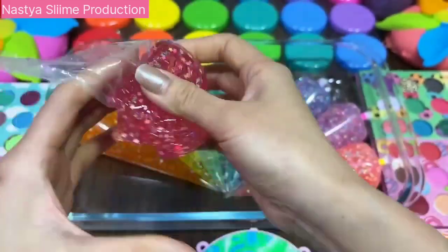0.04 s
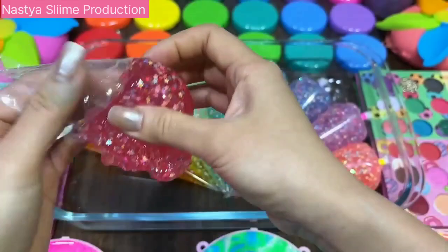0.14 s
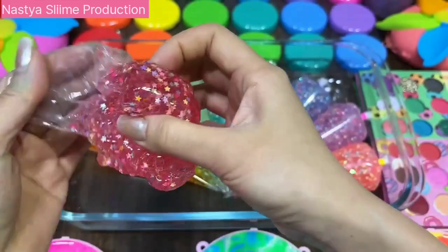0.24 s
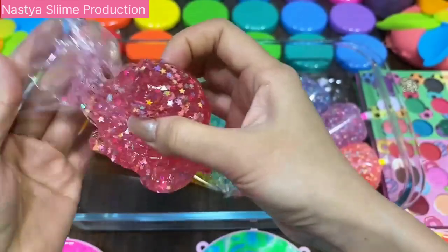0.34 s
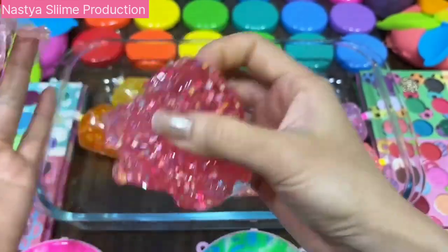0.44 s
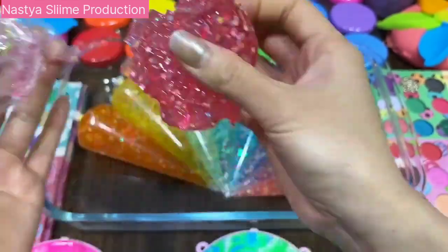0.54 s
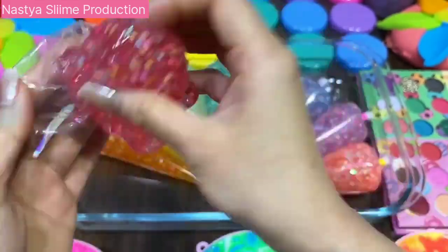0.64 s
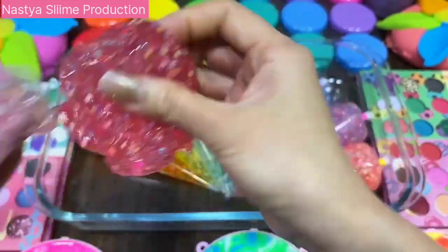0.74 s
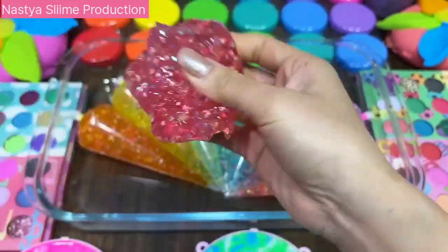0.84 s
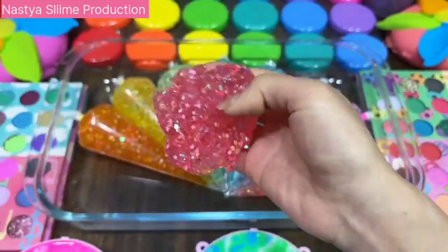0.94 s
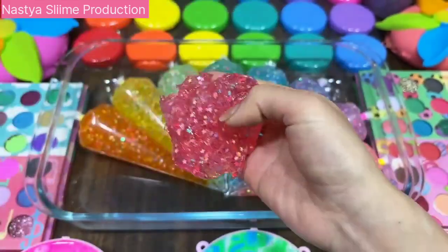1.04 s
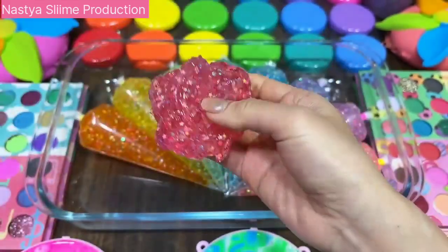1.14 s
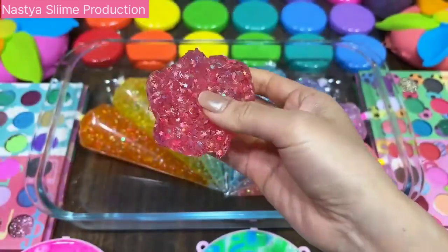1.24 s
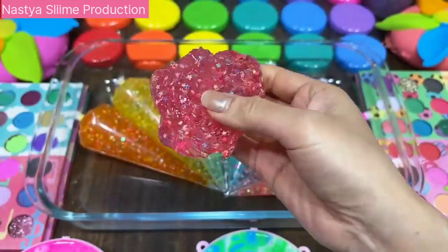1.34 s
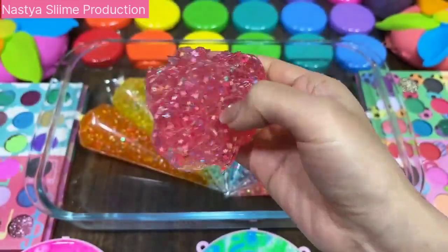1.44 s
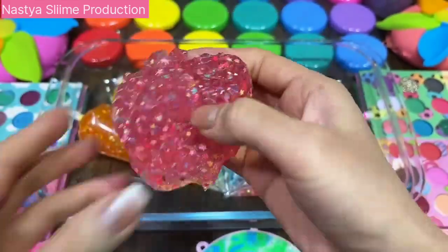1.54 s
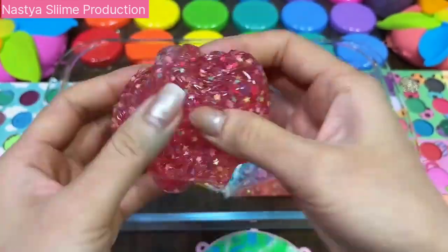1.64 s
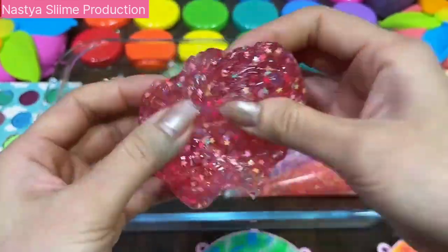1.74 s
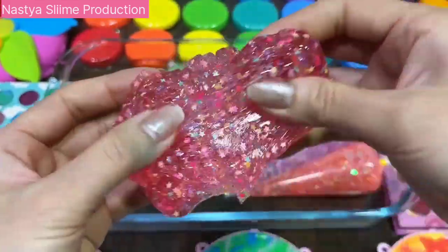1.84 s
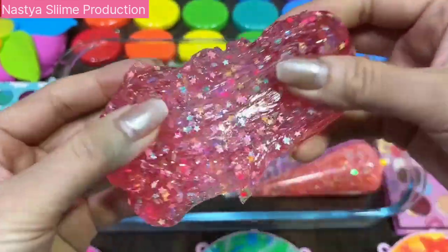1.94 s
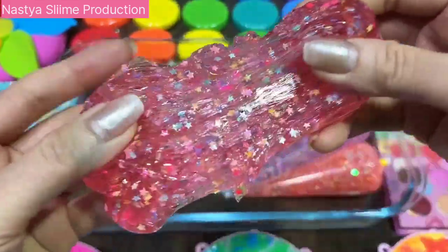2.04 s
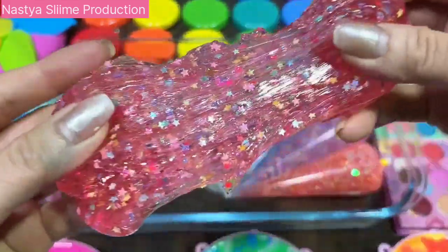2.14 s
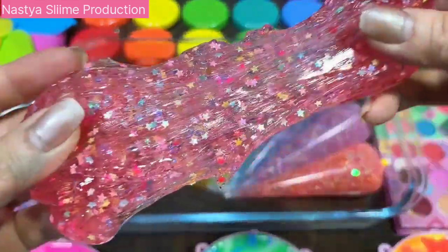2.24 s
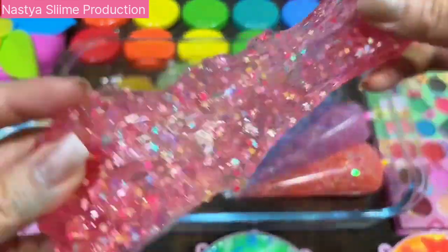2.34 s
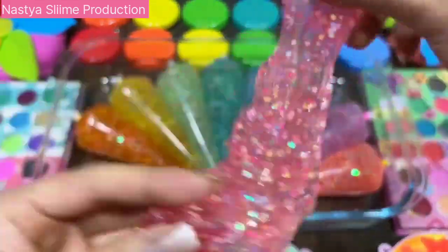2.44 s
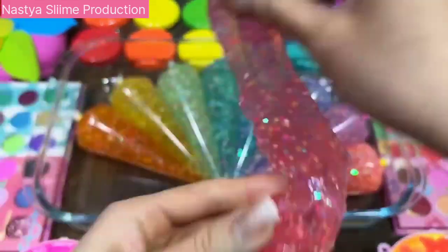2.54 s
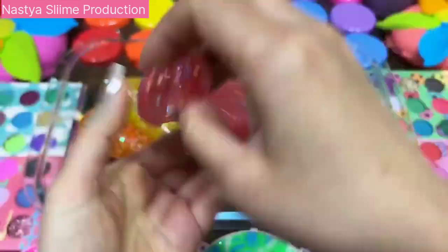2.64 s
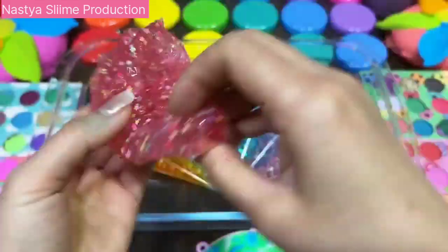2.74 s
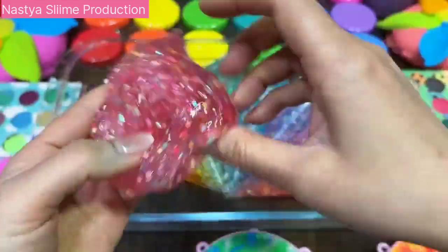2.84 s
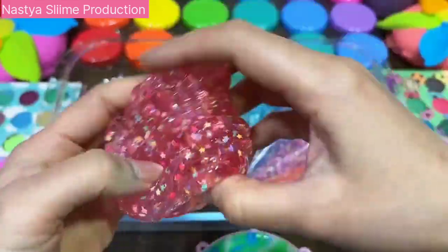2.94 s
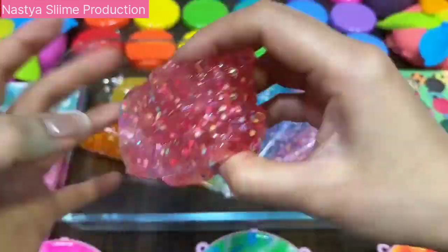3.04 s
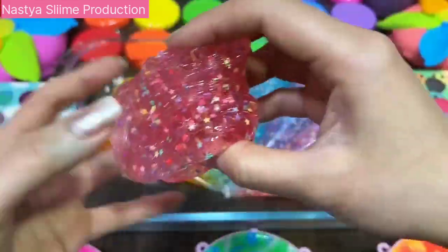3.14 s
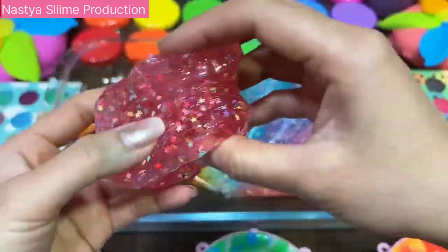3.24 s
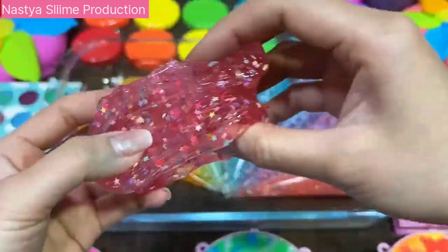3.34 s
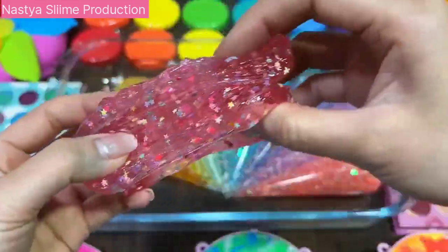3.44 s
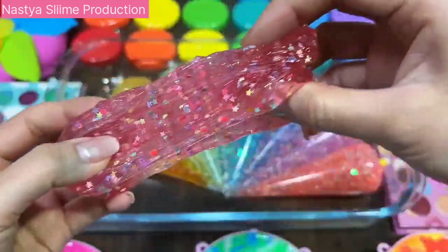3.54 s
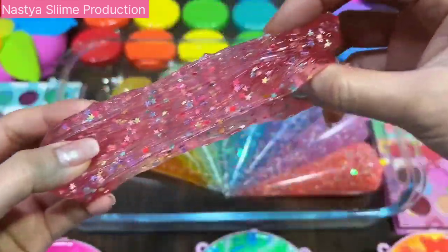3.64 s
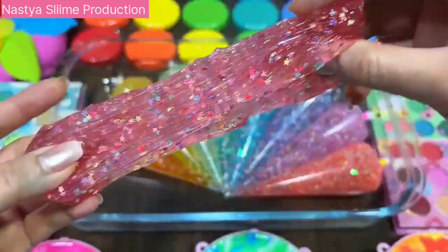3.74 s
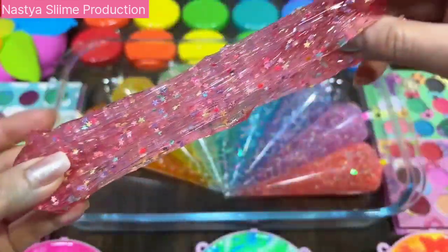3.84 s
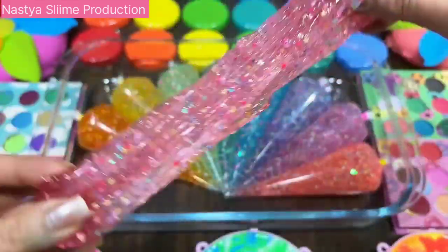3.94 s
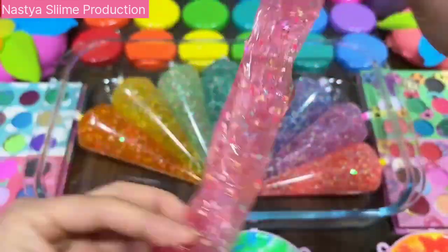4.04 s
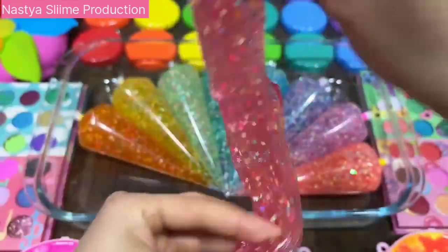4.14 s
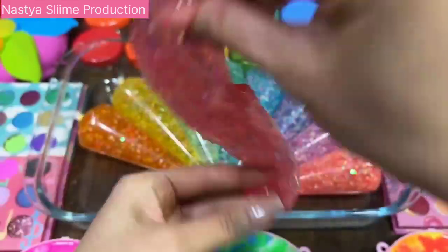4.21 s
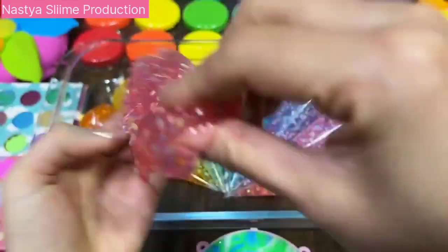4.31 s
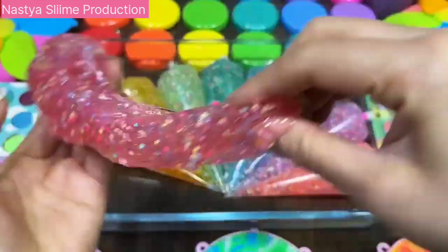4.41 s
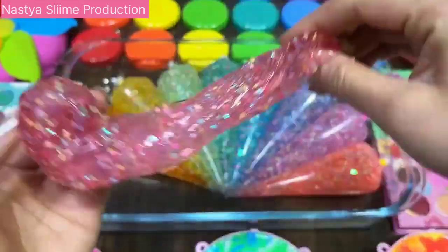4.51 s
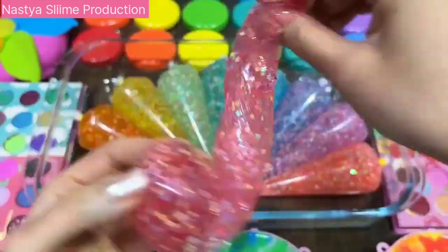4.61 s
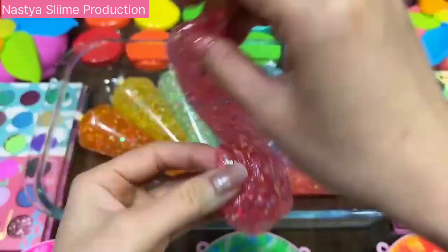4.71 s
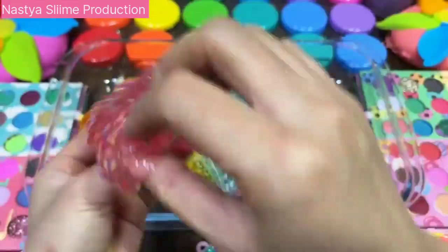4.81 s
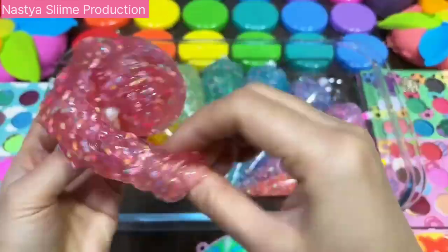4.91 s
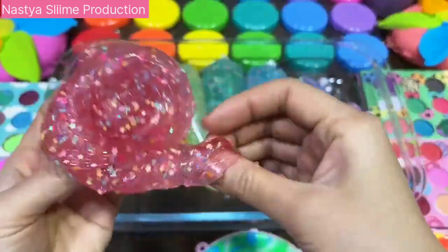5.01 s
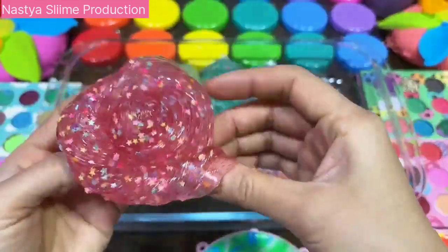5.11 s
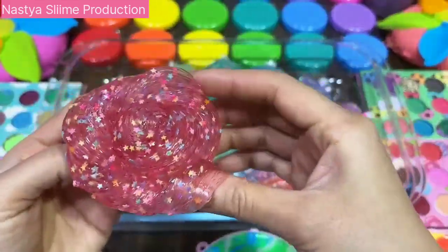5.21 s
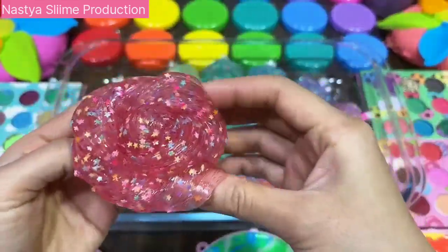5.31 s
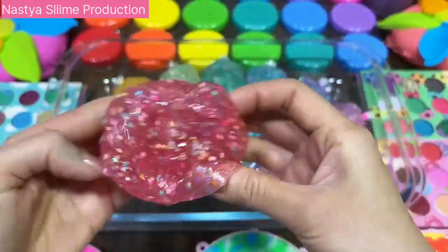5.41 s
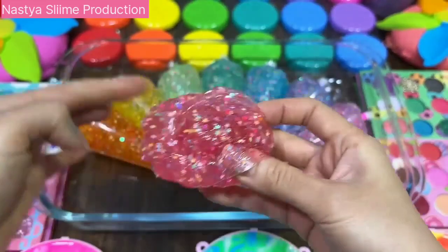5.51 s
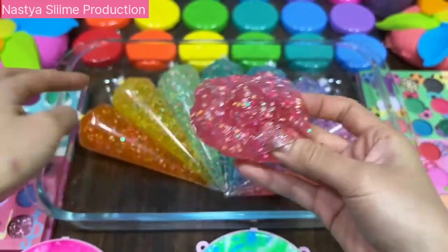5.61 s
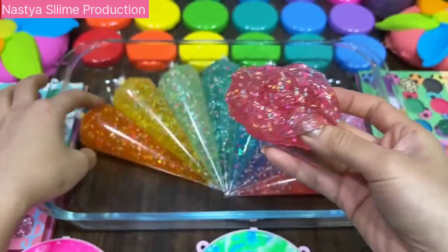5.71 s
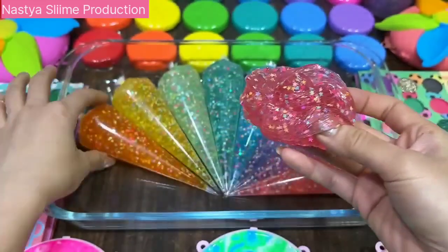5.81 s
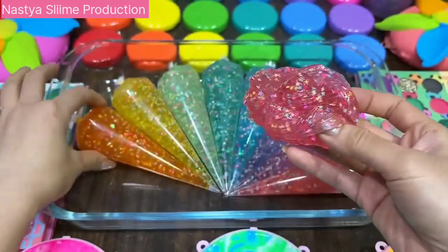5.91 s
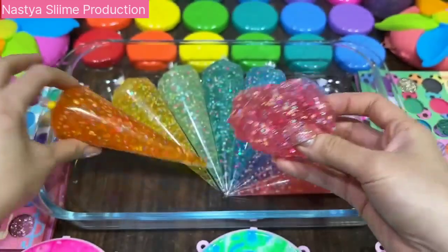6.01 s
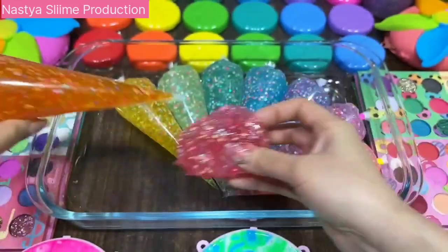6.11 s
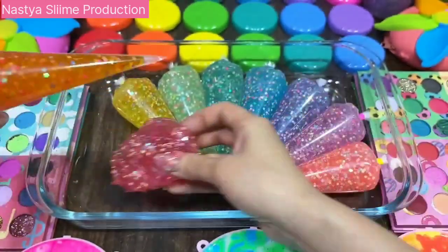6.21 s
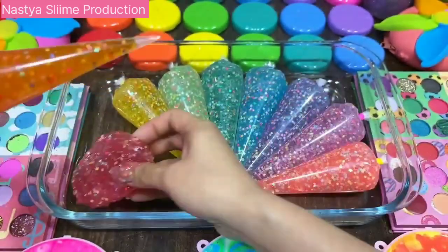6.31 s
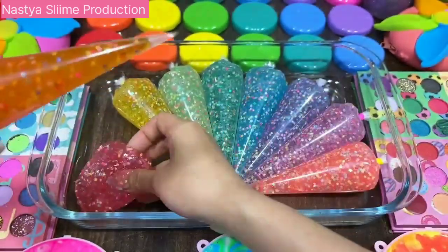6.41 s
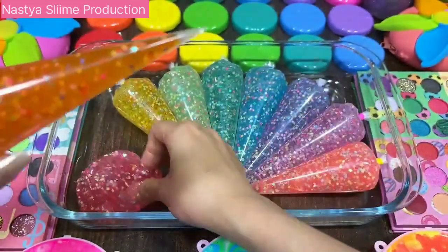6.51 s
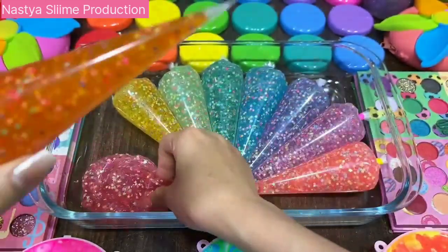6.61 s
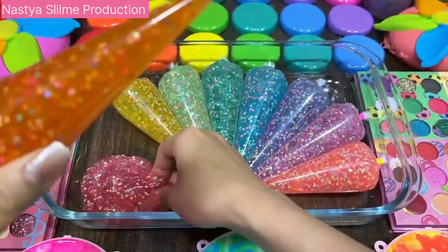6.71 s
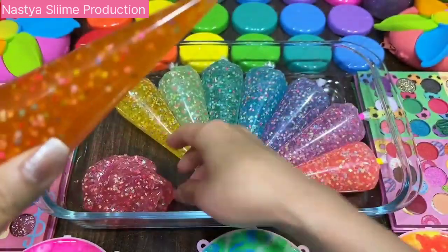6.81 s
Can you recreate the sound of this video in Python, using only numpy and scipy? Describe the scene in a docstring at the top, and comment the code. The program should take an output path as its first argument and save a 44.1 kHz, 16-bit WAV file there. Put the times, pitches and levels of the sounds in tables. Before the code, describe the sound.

Thin film crackles and snaps near the microphone, dense and bright, and stops after one second. After a nearly silent gap with an abrupt cut, glittery slime is squeezed and pulled very softly: small wet ticks, little hollow pops, one crisper click. Late on, it is set down with a muffled low bump and small crackles. Quiet indoor rumble and a narrow high hiss stay underneath.

```python
"""Hands work a thin plastic bag, heard close by in stereo, in a quiet room with low rumble and a hiss near 7 kHz.
First comes a second of loud crumpling: noise and tiny random creases rustle, short bursts with ringing folds snap.
Then an editor's splice plays one short quiet piece three times and leaves a brief silence.
Soft squeezing and sticky ticks follow, with short hollow rings; near 5.8 s damped low rings make a set-down thud.
"""
import sys
import numpy as np
from scipy import signal
from scipy.io import wavfile

SR = 44100
rng = np.random.default_rng(int(sys.argv[2]) if len(sys.argv) > 2 else 0)


def materialize(psi):
    """Save the field psi as 16-bit PCM at rate SR to the path in sys.argv[1].

    A 1-D psi becomes a single channel; in a 2-D psi each row is a channel.
    """
    bounded = np.clip(np.atleast_2d(psi).T, -1, 1)
    quanta = np.round(bounded * 32767).astype(np.int16)
    wavfile.write(sys.argv[1], SR, quanta)


N = 302526   # length in samples, about 6.9 s

# Each squeeze or pull of the film: peak_s, level_db (of the 4.5-8 kHz zone, before the hollows ring along),
# swell_s, fade_s, then relative to that level: low_db, middle_db, treble_db
SQUEEZES = [(.026, -54, .05, 0.082, -10.5, -3, 3), (0.069, -49.5, 0.029, 0.055, -8, -1, -3),
            (0.135, -43.5, 0.02, 0.056, -12, -2, 1), (.17, -49.5, 0.074, 0.087, -3, -1, -4),
            (0.207, -43.5, 0.017, 0.038, -1, 5.5, -14), (.252, -44.5, 0.025, 0.062, 2, 2, -7),
            (.272, -49, 0.036, 0.044, -4.5, 2.5, -7), (0.3, -37, 0.042, 0.073, -6.5, -3, 0.5),
            (.327, -42, .05, 0.03, -9, -3, 10.5), (.357, -42, 0.072, 0.09, -4.5, 2.5, -2.5),
            (.395, -48.5, .06, 0.058, -7.5, -5, 0), (0.426, -47, 0.029, 0.038, 0, -1, 2.5),
            (.527, -57.5, 0.027, 0.035, -10.5, -2, -3), (0.573, -67, 0.035, 0.048, 0, 4, 0),
            (.624, -64.5, 0.027, 0.044, 0, 0.5, -3.5), (.692, -44, .02, 0.056, -8.5, -2, -7),
            (0.717, -29.5, 0.024, 0.025, -21, -8, -3.5), (0.757, -42, 0.051, 0.056, -4.5, -2.5, -5.5),
            (.785, -45.5, 0.049, 0.033, -13, -6, -3.5), (0.81, -54.5, 0.069, 0.027, 1, 6, -7),
            (.866, -73, 0.13, 0.045, -5.5, 3.5, 0), (.94, -56.5, 0.019, 0.082, -9.5, -2, -4.5),
            (0.973, -56, 0.081, 0.027, -8.5, 2, 2.5), (1.0, -72.5, .05, 0.058, -13.5, 3.5, -7.5),
            (1.07, -81.5, .1, .2, -24, -9, -12), (1.225, -77.5, 0.088, .08, -20, -12.5, -6.5),
            (2.032, -75, 0.032, .08, -27.5, -18, -18.5), (2.116, -81.5, 0.038, 0.16, -25, -9.5, -11.5),
            (2.182, -70.5, 0.051, 0.038, -31.5, -6.5, -1), (2.243, -78.5, 0.042, 0.12, -25, 1.5, -2),
            (2.382, -76, .13, 0.22, -21.5, -8, 0), (2.495, -71, .045, 0.26, -24, -13.5, -6),
            (2.55, -72.5, .05, 0.038, -30.5, -12, -6.5), (2.682, -67.5, 0.15, 0.085, -29, -3.5, 2),
            (2.804, -71, 0.092, 0.28, -28.5, -9.5, 0.3), (2.932, -70, 0.072, 0.032, -33, -19, -7.5),
            (3.022, -61, 0.081, 0.065, -21, -10.5, -5), (3.06, -71, .05, 0.035, -11.5, 1, 0),
            (3.302, -74, 0.046, 0.096, -29, -6, 5.5), (3.417, -70, 0.048, 0.22, -22, -11.5, -3.5),
            (3.497, -71.5, 0.093, 0.062, -16, -8, -7), (3.569, -70.5, 0.024, 0.026, -19.5, -11.5, 1.5),
            (3.632, -68, 0.047, 0.036, -5.5, -6, -12.5), (3.76, -74.5, 0.19, 0.11, -25.5, -7.5, -1.5),
            (3.891, -72.5, 0.072, 0.11, -18, -8.5, 1), (4.035, -73, 0.038, 0.11, -26, -6.5, 1.5),
            (4.19, -62.5, 0.019, 0.043, -27, -11, -6.5), (4.29, -87, 0.062, .06, -12, -1.5, 4),
            (4.49, -80.5, .22, 0.29, -18, -8.5, -3), (4.625, -80, .1, .08, -14.5, -8.5, -4.5),
            (4.726, -72, 0.033, .035, -27.5, -16, -11), (4.812, -77.5, 0.16, 0.18, -27.5, -9, -3),
            (4.879, -55.5, 0.019, 0.06, -22, -9.5, -5.5), (4.985, -65, 0.025, 0.051, -22.5, -15.5, -6.5),
            (5.015, -70.5, .04, 0.068, -28, -13.5, -4), (5.365, -79.5, .03, 0.28, -23.5, -17.5, -20),
            (5.42, -64, 0.018, .08, -21.5, -17, -0.5), (5.45, -65, .05, 0.086, -15.5, -5.5, 1.8),
            (5.52, -75, 0.042, 0.045, -26, -7, 4.5), (5.636, -82, .035, .13, -19.5, -21, -29.5),
            (5.765, -75, 0.047, .11, -15.5, -12.5, -10.5), (5.858, -61, 0.043, 0.053, -4, -2.5, -4.5),
            (5.9, -73.5, 0.042, 0.09, -9, -5, 0.5), (6.135, -69.5, .035, 0.083, -12.5, -4, -3),
            (6.191, -77, 0.094, 0.078, -25, -8, -4.5), (6.342, -82, .2, .09, -24, -9.5, -12.5),
            (6.43, -79, 0.091, .1, -13.5, -1.5, -4), (6.488, -72, 0.11, 0.089, -13.5, -4.5, -2.5),
            (6.615, -86, 0.067, .25, -15.5, -10, -6), (6.757, -71, .025, .06, -9, -7, -0.5),
            (6.782, -66.5, 0.057, 0.092, -9, -8.5, 1.5)]
SQUEEZE_DEPTH_DB = 20   # a swell starts and a fade ends this far under the peak
SQUEEZE_ROUNDNESS = 1.1   # 1 is a sharp peak, more is a rounder top
SQUEEZE_BASS_SLOPE, SQUEEZE_BASS_DB = 1.5, -2.5   # the deepest zone follows the lows, more steeply
REST_DB = -110   # faint floor between squeezes


def handling():
    """Each squeeze swells to its peak and fades; overlapping ones add up as power. Gives a level in dB per zone."""
    columns = np.transpose(SQUEEZES)[:, :, None]
    peak_s, level_db, swell_s, fade_s, low_db, middle_db, treble_db = columns
    t = np.arange(0, N / SR + .002, .001)
    distance = np.maximum((peak_s - t) / swell_s, (t - peak_s) / fade_s)
    shape_db = level_db - SQUEEZE_DEPTH_DB * distance ** SQUEEZE_ROUNDNESS
    bass_db = SQUEEZE_BASS_SLOPE * low_db + SQUEEZE_BASS_DB
    zone_db = []
    for colour_db in (bass_db, low_db, middle_db, 0, treble_db):
        power = np.sum(from_db(shape_db + colour_db) ** 2, axis=0) + from_db(REST_DB) ** 2
        zone_db.append(np.interp(np.arange(N) / SR, t, 10 * np.log10(power)))
    return zone_db


# Hollows of the bag that ring along: pitch_hz, width_hz, level_db
BAG_HOLLOWS = [(746, 35, -8), (1520, 50, -7), (2899, 180, -4), (4560, 210, -6), (7070, 450, -4)]
# Extra left-right balance of the film's sound: pitch_hz, left_over_right_db
FILM_BALANCE = [(300, 0.5), (1500, 3.5), (4000, -0.5), (10000, -2.5)]
# Where the bag is held: time_s, left_over_right_db
BAG_PAN = [(0, 3.5), (0.449, 1), (.7, 3.5), (1.051, 3.5), (2.0, 2.5), (6.86, 2)]
GRAINS_PER_S, GRAIN_SPREAD_DB = 1500, 3   # typical rate of tiny creases, and how unequal they are


def rustle(soft_smooth_share, hard_smooth_share, patchy_db):
    """Thousands of tiny creases flip at random, in clumps, over a smooth sliding noise; the bag's hollows ring along."""
    zone_db = handling()
    drive_db = zone_db[3]
    flips = rng.random(N) < GRAINS_PER_S * from_db(4 * drift(60)) / SR
    sizes = flips * from_db(GRAIN_SPREAD_DB * np.minimum(rng.exponential(1, N), 3.8))
    # gentle handling slides, hard handling crackles
    smooth_share = np.interp(drive_db, [-72, -50], [soft_smooth_share, hard_smooth_share])
    smooth_share = np.clip(smooth_share, 0, 1)
    power = smooth_share + (1 - smooth_share) * rms_one(sizes) ** 2
    pairs = rng.standard_normal((2, 2, N)) * np.sqrt(power)

    film = np.zeros((2, N))
    for hz, band in bands(pairs, FILM_LIKENESS, 250, 17000):
        gain = from_db(film_db(hz, zone_db) + patchy_db * drift(37))
        film += band * gain * sides(at_hz(FILM_BALANCE, hz))[:, None]
    hollows = np.zeros((2, N))
    for hz, width_hz, level_db in BAG_HOLLOWS:
        b, a = signal.iirpeak(hz, hz / width_hz, fs=SR)
        hollows += from_db(level_db) * signal.lfilter(b, a, film)
    pan_db = np.interp(np.arange(N) / SR, *np.transpose(BAG_PAN))
    return (film + hollows) * sides(pan_db)


# Creases that snap: start_s, peak_db, ring_hz (fold), release_ms,
# then relative to the peak: low_db, middle_db, treble_db; last left_over_right_db
SNAPS = [(0.0233, -30.5, 6900, .71, -29, -20.5, 14, -0.5),
         (0.0658, -15, 5030, 0.48, -18, -10.5, -14.5, 2.5), (0.1314, -22.5, 4060, 0.67, -27, -21, -16, 1),
         (0.1414, -28.5, 3000, .46, -30, -19, -16, 13), (0.2032, -16, 800, .8, -10.5, -8.5, -30, -0.5),
         (0.2109, -28, 684, 0.33, -9, -17, -36, 5.5), (0.2279, -27, 2860, .67, -7, -1.5, -21, 1),
         (0.252, -11.5, 2980, 0.81, -12.5, -29, -19.5, 5.5), (0.29, -15.5, 5080, 0.63, -11, -15, -9, 6),
         (0.3098, -27, 3000, .52, -19, -23, -6, 9), (0.3218, -32, 7000, .45, -24, -6, -14, 6),
         (0.3422, -29, 2860, 0.72, -4, -1, -13, -6), (0.3528, -13, 1400, 0.97, -19, -8.5, -32, 7),
         (0.3603, -24, 6900, 0.92, -25, -33, -20.5, 0), (0.3849, -25, 2880, 0.67, -24, -14, -27, 7),
         (0.4186, -22.5, 7100, 0.27, -20, -13, -15, -3), (0.4245, -22.5, 3070, 0.55, -11, -13, -21, 7),
         (0.5303, -37, 2650, 0.97, -11, -16, -24, 3.5), (0.5703, -30, 2600, 0.73, -4, -6, -34, 2.5),
         (0.618, -31, 1420, 0.34, -2, -7.5, -33, 4), (0.648, -52, 2790, .66, -6, -2.5, -9, 3),
         (0.6902, -26.5, 3220, .67, -26, -21, -32, 1.2), (0.704, -25.5, 5870, 0.6, -26, -16, -16, 1.5),
         (0.718, -13, 6160, .73, -28, -28, -27, 0), (0.7301, -32, 7100, 0.79, -14, -21, -15, 6),
         (0.7512, -16.5, 5000, 0.5, -22, -13, -20.5, 11.5), (0.7548, -14.5, 6340, 0.41, -15, -17, -38, 2),
         (0.7687, -29, 6450, 0.85, -4, -15, -24, 16), (0.8488, -45, 7210, .6, -19, -18, -9, -2.5),
         (0.9668, -25.5, 3510, 0.88, -36, -8.5, -17, 1), (0.9781, -37.5, 1860, 0.51, -30, -4, -29, 12.5),
         (2.027, -47, 6850, 0.83, -36.5, -34.5, -31.5, 3), (2.114, -52, 6210, 0.66, -33, -24, -2, 2),
         (2.156, -47, 7110, 0.86, -32, -29, -5, -4.5), (2.469, -57.5, 6920, 0.58, -30.5, -22, -8, 1),
         (2.547, -48.5, 6880, .46, -31, -23.5, -14, -1.2), (2.605, -57, 4000, 0.69, -32, -8, -14, 1.5),
         (2.765, -59, 6900, .6, -30.5, -28, 5.5, 1), (2.8794, -51, 6670, .6, -22, -15.5, -10.5, 1),
         (3.0395, -55.5, 1900, .6, -29, -17, -11.5, 10.5), (3.3074, -56, 4090, .52, -25, -13, -8.5, -0.5),
         (3.4065, -44, 7050, .6, -32, -38.5, -23, 3.5), (3.49, -54, 6930, .6, -21, -18.5, -18, -2),
         (3.4995, -49, 7050, 0.79, -20, -22, -18, 0.6), (3.5573, -46, 6900, 0.65, -29, -24, -7, 3),
         (3.6174, -39, 1500, .73, -19.5, -15.5, -35.5, 3.5), (3.697, -56, 6900, .6, -30.5, -26.5, -2, 2.5),
         (3.743, -52.5, 6810, .55, -29.5, -21, -4.5, -3), (3.8267, -52.5, 6650, 0.63, -31, -30.5, 1.2, 4),
         (3.898, -52, 6900, .6, -29, -23.5, -4.5, 0.5), (4.033, -51, 6900, .6, -30.5, -22, 0.5, 1.5),
         (4.1808, -41.5, 6610, 0.6, -30.5, -20, -25, -2), (4.4863, -50, 6440, .65, -31.5, -29, -6, 0),
         (4.7215, -53, 6500, .6, -27.5, -21, -12.5, 2), (4.809, -49, 6920, .72, -27.5, -14.5, -6.5, 4),
         (4.8781, -22.5, 6800, 0.66, -51, -35.5, -40, 1), (4.977, -48.5, 7160, .49, -30, -19.5, -17, 2.5),
         (5.0092, -53, 6760, .46, -33.5, -23, -17.5, 2), (5.4973, -41.5, 6750, 0.96, -38, -32, -0.6, -2),
         (5.8298, -33.5, 6460, 0.85, -17.5, -25.5, -11, 1.5), (5.865, -50, 4260, .67, -13, -7, -23, 0.3),
         (5.8904, -44.5, 7030, .6, -23, -21.5, 1, 6), (5.896, -43.5, 6290, .98, -26.5, -26, -0.3, 4.5),
         (6.136, -35.5, 6200, 0.66, -35, -14, -20, 6), (6.1882, -44.5, 6520, 0.79, -33, -25, -14, -1.5),
         (6.4984, -59.5, 3576, .6, -21, -13, -14.5, 5.5)]
SNAP_BASS_SLOPE, SNAP_BASS_DB = .9, -5.5   # the deepest zone follows the lows
SNAP_TOP_DB = -11   # the 4.5-8 kHz zone is the same for all snaps
FOLD_CYCLES = 11   # a fold's ring falls by 60 dB in this many cycles
FOLD_SHARE = 1   # strength of the fold beside the burst


def snaps():
    """Each snap is a short ragged burst, coloured by the film, with one fold ringing out."""
    start_s, peak_db, ring_hz, release_ms, low_db, middle_db, treble_db, pan_db = np.transpose(SNAPS)
    bass_db = SNAP_BASS_SLOPE * low_db + SNAP_BASS_DB
    zone_db = [bass_db, low_db, middle_db, SNAP_TOP_DB + 0 * start_s, treble_db]
    count = len(start_s)
    t = np.arange(1500) / SR
    age = 1000 * t / release_ms[:, None]
    shape = age ** 2 * np.exp(-2 * age)   # the crease gives way, then lets go
    draws = rng.standard_normal((count, 5, len(t)))
    raggedness = from_db(6.2 * draws[:, 4:])
    bursts = draws[:, :4] * shape[:, None] * raggedness

    scatter = rng.standard_normal((count, len(EDGES)))   # every snap has its own colour
    pairs = bursts.transpose(1, 0, 2).reshape(2, 2, count, -1)
    body = np.zeros((2, count, len(t)))
    for k, (hz, band) in enumerate(bands(pairs, FILM_LIKENESS, 250, 17000)):
        body += band * from_db(film_db(hz, zone_db) + 1.9 * scatter[:, k])[:, None]

    out = np.zeros((2, N + len(t)))
    for k, at in enumerate(np.round(start_s * SR).astype(int)):
        push = bursts[k, 0] + 0.12 * bursts[k, 1] * [[1], [-1]]   # slightly different left and right
        fold = ring(push, ring_hz[k], FOLD_CYCLES / ring_hz[k])
        b, a = signal.iirpeak(ring_hz[k], 1.5, fs=SR)
        fold = signal.lfilter(b, a, fold)   # a small fold sends out no bass
        snap = rms_one(body[:, k]) + FOLD_SHARE * rms_one(fold)
        snap = snap / np.abs(snap.mean(axis=0)).max()   # the peak sets the size
        out[:, at:at + len(t)] += snap * from_db(peak_db[k]) * sides(pan_db[k])[:, None]
    return out[:, :N]


# Basic colour of the film: pitch_hz, level_db (per Hz)
FILM = [(160, -55), (280, -23), (344, -7.5), (436, -8.5), (792, -7), (1010, -3.5), (1420, -8), (1800, -10),
        (2950, -10), (4010, -6.5), (6910, 2), (9080, -19.5), (12600, -11), (15700, -18), (16500, -35)]
# How alike left and right are for the film: pitch_hz, likeness (0 unrelated, 1 identical)
FILM_LIKENESS = [(250, .7), (700, .6), (1400, .3), (3100, .5), (6800, .45), (10000, 0), (15000, .1)]
# Zones of the film's sound (bass, low middle, middle, top, treble): low_hz, high_hz
ZONES = [(280, 700), (800, 1600), (1900, 4000), (4500, 8000), (10500, 15500)]


def film_db(hz, zone_db):
    """The film's colour, bent so that each zone carries its own level."""
    zone_ends = np.log(np.ravel(ZONES))
    level_db = at_hz(FILM, hz)
    for z, (low, high) in enumerate(ZONES):
        grid = np.linspace(low, high, 40)
        density = np.mean(from_db(at_hz(FILM, grid)) ** 2)
        carried_db = 10 * np.log10(density * np.ptp(grid) * 2 / SR)
        # full inside the zone, sliding to nothing at its neighbours
        share = np.interp(np.log(hz), zone_ends, np.repeat(np.eye(5)[z], 2))
        if share:
            level_db = level_db + share * (zone_db[z] - carried_db)
    return level_db


# Short hollow rings, likely air pockets popping: start_s, peak_db, pitch_hz
POCKETS = [(0.6193, -37, 1350), (.637, -52.5, 1450), (2.882, -62.5, 1848), (3.018, -63.5, 1910),
           (3.035, -64, 1770), (3.05, -62.5, 2100), (3.545, -66, 952), (3.562, -55.5, 910),
           (3.571, -56, 980), (3.581, -61, 936), (3.618, -52, 1690), (3.62, -53, 1106), (6.137, -46, 1980),
           (6.15, -60, 2110), (6.766, -59, 1124), (6.771, -56, 1060), (6.78, -57, 3000),
           (6.782, -50.5, 1130), (6.807, -57.5, 1110)]
POCKET_T60_S = 0.027   # time to fall by 60 dB
# Dull knocks, a thump in the crumpling, then the set-down and its bounces:
# start_s, peak_db, body_hz, t60_s (time to fall by 60 dB)
THUDS = [(0.755, -29, 341.4, 0.04), (5.835, -44, 88.4, 0.11), (5.85, -43.5, 61.9, 0.096),
         (5.865, -50, 200.5, 0.13), (5.877, -44.5, 184, 0.088), (5.86, -49, 323, 0.078),
         (5.885, -59.5, 311, 0.065)]


def knocks(table, contact_s, pan_db):
    """A soft noisy contact rings one damped resonance."""
    out = np.zeros(N + 9000)
    length = round(contact_s * SR)
    for start_s, peak_db, hz, t60 in table:
        push = np.zeros(9000)
        push[:length] = np.hanning(length) * (1 + .5 * rng.standard_normal(length))
        tone = ring(np.gradient(push), hz, t60)
        at = round(start_s * SR)
        out[at:at + len(push)] += tone / np.abs(tone).max() * from_db(peak_db)
    return out[:N] * sides(pan_db)[:, None]


# How alike left and right are for the room: pitch_hz, likeness (0 unrelated, 1 identical)
ROOM_LIKENESS = [(40, .9), (130, .72), (290, .55), (640, .3), (1400, .2), (3100, .37), (6800, .53),
                 (15000, 0)]


def room_noise(spectrum, low_hz, high_hz, patchy_db):
    """Steady stereo noise, rms 1, shaped band by band; each band's level wanders slowly."""
    white = rng.standard_normal((2, 2, N))
    out = np.zeros((2, N))
    for hz, band in bands(white, ROOM_LIKENESS, low_hz, high_hz):
        out += band * from_db(at_hz(spectrum, hz) + patchy_db * drift(1.8))
    return rms_one(out)


LOOP_START_S, LOOP_LENGTH_S, RESUME_S = 1.142, .2667, 2.007
LOOP_FADE_S = 0.0065


def splice(x):
    """One quiet piece, faded at both ends, plays three times; silence follows until the sound fades back in."""
    start, length, resume = round(LOOP_START_S * SR), round(LOOP_LENGTH_S * SR), round(RESUME_S * SR)
    t = np.arange(length) / SR
    piece = x[:, start:start + length] * np.clip(np.minimum(t, t[::-1]) / LOOP_FADE_S, 0, 1)
    n = np.arange(N)
    outside_s = np.maximum(start - n, n - resume) / SR   # distance from the spliced stretch
    out = x * np.clip(outside_s / LOOP_FADE_S, 0, 1)
    out[:, start:start + 3 * length] = np.tile(piece, 3)
    return out


def from_db(db):
    """Turn decibels into gain."""
    return 10 ** (np.asarray(db) / 20)


def rms_one(x):
    """Scale to rms 1."""
    return x / np.sqrt(np.mean(x ** 2) + 1e-20)


def at_hz(points, hz):
    """Read a table between its points, with pitch on a log axis."""
    table_hz, values = np.array(points).T
    return np.interp(np.log(hz), np.log(table_hz), values)


def drift(rate_hz):
    """A slow random wander of spread 1: smoothed noise made at every 40th sample, then joined by lines."""
    r = np.exp(-80 * np.pi * rate_hz / SR)
    noise = rng.standard_normal(N // 40 + 2002)
    slow = signal.lfilter([1], [1, -2 * r, r * r], noise)[2000:]   # drop the filter's start-up
    return np.interp(np.arange(N) / 40, np.arange(len(slow)), rms_one(slow))


def ring(x, hz, t60):
    """A damped resonance: a unit click starts a sine of height about 1 that falls by 60 dB in t60 seconds."""
    r, w = from_db(-60 / (t60 * SR)), 2 * np.pi * hz / SR
    return signal.lfilter([0, np.sin(w)], [1, -2 * r * np.cos(w), r * r], x)


# Borders of the narrow bands, in Hz
EDGES = np.concatenate([20 * 2 ** np.arange(0, 8.1, 1 / 3),
                        np.arange(5800, 8300, 600), np.arange(9200, 17300, 1000)])


def bands(pairs, likeness, low_hz, high_hz):
    """Cut noise into narrow stereo bands; neighbours come from unrelated (mid, side) pairs."""
    for k, (low, high) in enumerate(zip(EDGES, EDGES[1:])):
        if low_hz <= low < high_hz:
            sos = signal.butter(2, [low, high], "band", fs=SR, output="sos")
            mid, side = signal.sosfilt(sos, pairs[k % 2])
            hz = np.sqrt(low * high)
            alike = np.clip(at_hz(likeness, hz), -1, 1)
            mid, side = np.sqrt(1 + alike) * mid, np.sqrt(1 - alike) * side
            yield hz, np.array([mid + side, mid - side])


def sides(pan_db):
    """Left and right gains; a positive value makes the left louder."""
    return from_db(np.array([pan_db / 2, -pan_db / 2]))


# Colour of the low rumble: pitch_hz, level_db (per Hz, relative)
RUMBLE = [(12, -33), (20, -5.5), (102, 1), (180, -11), (209, -17.5), (247, -11.5), (300, -25.5), (390, -52),
          (660, -120)]
# Level of the low rumble over time: time_s, level_db
RUMBLE_LEVEL = [(0, -55), (.11, -72.5), (0.212, -64), (1.13, -78), (1.145, -61), (1.41, -64.5),
                (2.02, -76.5), (2.41, -75), (3.11, -66), (4.5, -66.5), (4.76, -64.5), (5.79, -64.5),
                (6.4, -66), (6.86, -65.5)]
# Colour of the hiss, with a peak near 7 kHz: pitch_hz, level_db (per Hz, relative)
HISS = [(250, -6), (450, -7), (900, -13), (3000, -20.5), (5400, -19.5), (6150, -15.5), (6900, -2),
        (7550, -15.5), (8000, -24), (11000, -25), (13500, -29), (14500, -41), (16500, -55)]
HISS_DB = -72.5   # rms level


def scene():
    """Add bag, hands and room, then splice."""
    bag = rustle(soft_smooth_share=0.68, hard_smooth_share=0.35, patchy_db=3.5) + snaps()
    pocket_rows = [(*row, POCKET_T60_S) for row in POCKETS]
    pockets = knocks(pocket_rows, contact_s=0.00018, pan_db=4.0)
    thuds = knocks(THUDS, contact_s=0.0026, pan_db=2.5)
    hiss = from_db(HISS_DB) * room_noise(HISS, 250, 17000, patchy_db=0.16)
    rumble = room_noise(RUMBLE, 20, 320, patchy_db=1.0) * sides(1.0)[:, None]
    rumble_db = np.interp(np.arange(N) / SR, *np.transpose(RUMBLE_LEVEL))
    return splice(bag + pockets + thuds + hiss + rumble * from_db(rumble_db))


CUTOFF_HZ = 17000   # from here up the sound is at least 70 dB down


def record(dry):
    """The sound has a narrow dip near 10 kHz; a steep low-pass filter cuts the top."""
    b, a = signal.iirnotch(9900, 9.0, fs=SR)
    dipped = signal.lfilter(b, a, dry)
    return signal.sosfilt(signal.cheby2(12, 70, CUTOFF_HZ, fs=SR, output="sos"), dipped)


dry = scene()
out = record(dry)
materialize(out)
```